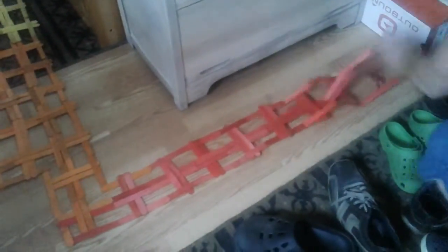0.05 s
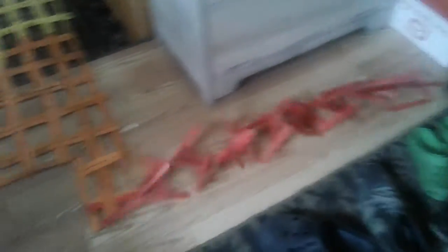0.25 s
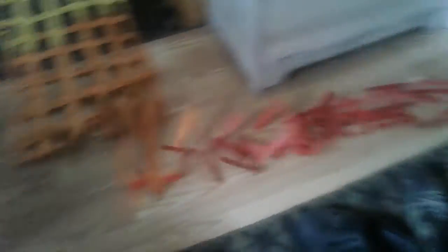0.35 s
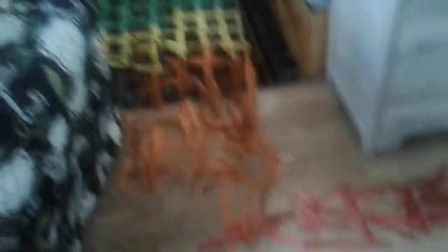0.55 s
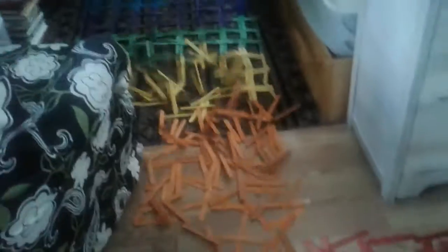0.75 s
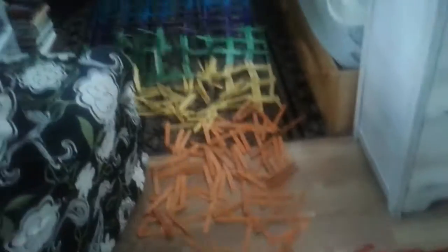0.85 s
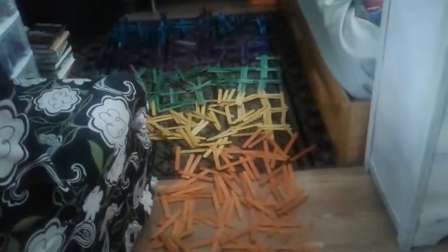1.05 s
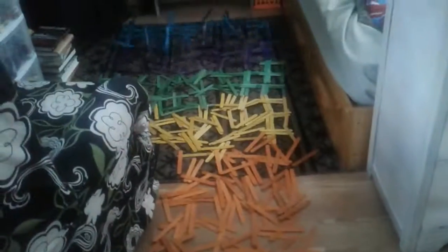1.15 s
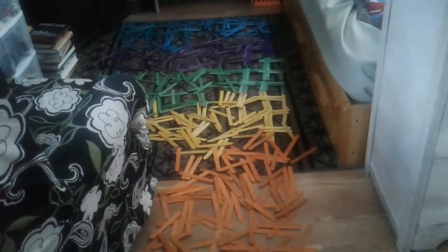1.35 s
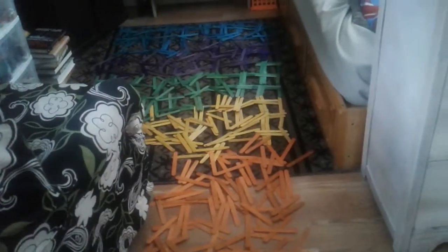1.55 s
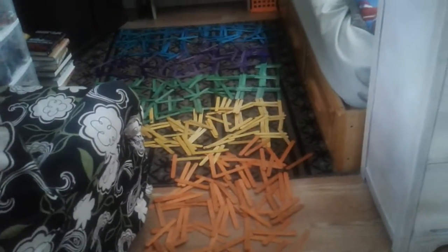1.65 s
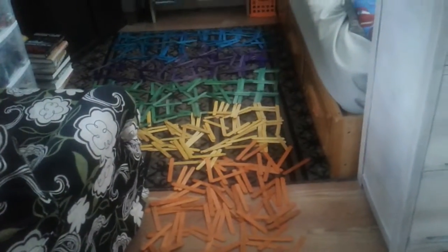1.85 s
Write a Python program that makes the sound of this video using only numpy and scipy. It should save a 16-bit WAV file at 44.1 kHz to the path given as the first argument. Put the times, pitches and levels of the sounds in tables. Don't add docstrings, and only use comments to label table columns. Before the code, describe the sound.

Quiet room with a very faint high whine; faint ticks of slipping wooden sticks from 0.05 s, with a small knock near 0.13. At 0.2 s the chain lets go into a loud, dense, bright clatter, with sharp snaps, ringing ticks and hollow floor slaps until about 1.0. It gradually thins to 1.45, last clumps tick around 1.5-1.65, then a short room tail sinks to near silence.

```python
import sys
import numpy as np
from scipy import signal
from scipy.fft import rfft, irfft
from scipy.io import wavfile

SR = 44100
rng = np.random.default_rng(int(sys.argv[2]) if len(sys.argv) > 2 else 0)


def amplitude_ratio(level_db):
    exponent = np.asarray(level_db, float) / 20
    return 10 ** exponent


def transcribe(u):
    v = np.clip(np.atleast_2d(u).T, -1, 1)
    q = np.round(v * 32767).astype(np.int16)
    wavfile.write(sys.argv[1], SR, q)


N = 83790

# start_s, swell_db, extra_crispness_db, length_s
HANDFULS = [(.222, 2.5, 6.5, 0.006), (.24, -4, 1, 0.0086), (.293, 5.5, -20, 0.0041), (.345, 2.5, 0, 0.02),
            (.374, 4.5, -4, 0.0042), (.444, 4.5, 6, 0.014), (.488, 0, 12, 0.0028), (.548, 1, 7, 0.018),
            (.601, 6.5, -1, 0.0018), (.648, 5.5, -1, 0.0049), (.683, -0.5, -2, 0.0037),
            (.716, -1, 12.5, 0.012), (.751, 1.5, 9, 0.0049), (.808, 0, 5, 0.0068), (.863, -0.5, 4, 0.0047),
            (.903, 2, 3, 0.017), (.956, 2.5, 2, 0.0096), (1.028, 3.5, -0.5, 0.023), (1.065, 0, 4.5, 0.014),
            (1.148, 2.5, 0, 0.012), (1.18, 1, 4, 0.014), (1.226, 1.5, 0.5, 0.021), (1.288, 6, 0, 0.034),
            (1.375, 2.5, -4.5, 0.014), (1.428, 2, 1.5, 0.026), (1.514, 7.5, 4.5, 0.022),
            (1.568, 8, 8, 0.005), (1.604, 8, 4.5, 0.014), (1.548, 0.5, 0, 0.006), (1.72, 10.5, -4.5, 0.01),
            (1.668, 5, -4, .01), (1.794, 16, -3, 0.019)]
CLUMP_HITS_PER_S = 4000
CRISP_AT_DB = -11
SINGLE_RISE_S = 0.0009


def evened(x):
    return x / np.sqrt(np.mean(x ** 2) + 1e-20)


def read(points, hz):
    f, value = np.transpose(points)
    return np.interp(np.log(hz + 1), np.log(f + 1), value)


def coloured(x, points):
    log_gain = np.log(amplitude_ratio(read(points, abs(np.fft.fftfreq(4096, 1 / SR)))))
    minimum_phase = np.exp(np.conj(signal.hilbert(log_gain)))
    taps = np.fft.ifft(minimum_phase).real[:2048]
    return signal.oaconvolve(x, taps)[:len(x)]


def swells(t, start_s, swell_db, length_s):
    distance = (t[:, None] - start_s) / np.maximum(length_s, .002)
    return (swell_db * np.exp(-.5 * distance ** 2)).sum(1)


def hush():
    # pitch_hz, level_db (per Hz)
    hush_tone = [(30, -5), (60, -2.5), (130, -5), (430, -6), (1000, -24), (3000, -31.5), (11000, -55.5),
                 (15800, -40.5)]
    level_db, brush_s, brush_db, brush_length_s = -65.5, 0.2, 12.5, 0.061
    brush = amplitude_ratio(swells(np.arange(N) / SR, np.array([brush_s]), brush_db, brush_length_s))
    noise = coloured(rng.standard_normal(N + 3000), hush_tone)[3000:]
    return amplitude_ratio(level_db) * brush * evened(noise)


def whine():
    pitch_hz, level_db = 15735, -81
    return amplitude_ratio(level_db) * np.sin(2 * np.pi * pitch_hz * np.arange(N) / SR)


def strikes(per_s):
    spread_db = 1.5
    draw = rng.random((3, N))
    size = amplitude_ratio(spread_db * np.minimum(-np.log(draw[1] + 1e-9), 4))
    push_or_pull = np.sign(draw[2] - .5)
    return evened(size * push_or_pull * (draw[0] < per_s / SR))


def falling_sticks():
    # start_s, level_db, floor_knock_share_db
    swarm = [(.05, -83, -1), (.058, -65, 2), (.09, -62.5, 18.5), (.13, -44, 6.5), (.17, -33.5, 0),
             (0.2062, -33, -1), (0.2068, -16.5, 2), (.45, -16, -1), (.8, -15.5, -5.5), (1.07, -19.5, -1),
             (1.11, -19, -4.5), (1.3, -21.5, -0.5), (1.44, -20, -4.5), (1.47, -25, -15.5),
             (1.63, -30.5, -13), (1.67, -42.5, -16), (1.76, -53, -10.5), (1.88, -75.5, -1)]
    # start_s, level_db, floor_knock_db, length_s
    first_slips = [
        (0.0567, -54, -4.5, 0.0095),
        (0.091, -37, -3.5, 0.0068),
        (0.189, -21, -27.5, 0.006),
    ]
    # start_s, swell_db, length_s
    slaps = [
        (0.373, 13.5, .008),
        (0.401, 7, .004),
        (0.503, 8, 0.0048),
        (0.65, 6, 0.034),
        (0.734, 9, .015),
        (.897, 1, .01),
        (1.535, 5.5, .01),
        (1.611, 2, 0.005),
    ]
    hits_per_s, swarm_db, slip_db, first_contact = 2800, -3.5, -3.5, 0.5
    board_db, slip_board_db = -17.5, 5.5

    t = np.arange(N) / SR
    s, level_db, knock_db = np.transpose(swarm)
    start_s, swell_db, _, length_s = np.transpose(HANDFULS)
    busy_db = np.interp(t, s, level_db, left=-120)
    hits = strikes(hits_per_s) * amplitude_ratio(swarm_db + busy_db)
    on_sticks = hits * amplitude_ratio(swells(t, start_s, swell_db, length_s))
    board_share_db = np.interp(t, s, knock_db) + swells(t, *np.transpose(slaps))
    on_boards = hits * amplitude_ratio(board_db + board_share_db)

    burst = strikes(CLUMP_HITS_PER_S)
    for start, slip_level_db, floor_db, lasting in first_slips:
        at = round(start * SR)
        fade_db = -20 * np.minimum(t[:N - at] / max(lasting, .001), 6)
        slip = burst[at:] * amplitude_ratio(slip_level_db + slip_db + fade_db)
        slip[0] += first_contact * amplitude_ratio(slip_level_db + slip_db)
        on_sticks[at:] += slip
        on_boards[at:] += slip * amplitude_ratio(floor_db + slip_board_db)
    return on_sticks, on_boards, busy_db


def rung(hits, low_hz, high_hz, t60_s, tick_db, count):
    patch_db, patch_s, family_width = 2.5, .025, 0.3545
    which, t = rng.integers(0, count, N), np.arange(1000) / SR
    centre = (np.arange(count)[:, None, None] + .5) / count
    place = np.clip(centre + family_width * (rng.random((count, 3, 1)) - .5), 0, 1)
    knots = np.arange(0, N / SR + 1, patch_s)
    drift = rng.standard_normal((200, 6))[:len(knots)]
    patches = [amplitude_ratio(patch_db * np.interp(np.arange(N) / SR, knots, d)) * hits for d in drift.T]
    out = amplitude_ratio(tick_db) * hits
    for k, lasting in enumerate(rng.random((count, 3, 1))):
        hz = low_hz * (high_hz / low_hz) ** place[k]
        decay = amplitude_ratio(-60 * t / (t60_s * (.5 + lasting))) / np.sqrt(.5 + lasting)
        ring = (np.sin(2 * np.pi * hz * t) * decay).sum(0)
        own_hits = patches[6 * k // count] * (which == k)
        out = out + signal.oaconvolve(own_hits, ring / np.linalg.norm(ring))[:N]
    return out


def ringing_wood(on_sticks, busy_db):
    crisp_hz, crisp_per_db = 8500, 0.57
    start_s, _, extra_db, length_s = np.transpose(HANDFULS)
    wood = rung(on_sticks, low_hz=1909, high_hz=10060, t60_s=0.021, tick_db=4, count=72)
    edge = signal.sosfiltfilt(signal.butter(2, crisp_hz, "high", fs=SR, output="sos"), wood)
    extra_crisp_db = swells(np.arange(N) / SR, start_s, extra_db, length_s)
    crisp = amplitude_ratio(crisp_per_db * (busy_db - CRISP_AT_DB) + extra_crisp_db)
    return wood + (crisp - 1) * edge


def close_snaps():
    # start_s, peak_db
    snaps = [(0.237, -32), (0.3447, -30.5), (0.3737, -29.5), (0.3944, -34), (0.408, -30), (0.428, -31.5),
             (0.4413, -32), (0.4744, -28), (0.512, -32.5), (0.5649, -29.5), (0.6156, -25.5), (0.64, -32),
             (0.683, -32.5), (0.7102, -28.5), (0.7309, -29), (0.9057, -32), (0.954, -36.5), (1.0223, -35),
             (1.0729, -36), (1.5597, -40)]
    snap_db, t60_s = 32, .015
    burst, out = strikes(CLUMP_HITS_PER_S), np.zeros(N)
    fade = amplitude_ratio(-60 * np.arange(800) / SR / t60_s)
    for start, peak_db in snaps:
        at = round(start * SR)
        snap = burst[at:at + 800] * fade
        out[at:at + 800] += amplitude_ratio(peak_db + snap_db) * snap / np.linalg.norm(snap)
    return out


def resonate(x, hz, width_hz):
    r = np.exp(-np.pi * width_hz / SR)
    turn = 2 * np.pi * hz / SR
    return signal.lfilter([1 - r * r], [1, -2 * r * np.cos(turn), r * r], x) * np.sin(turn)


def through_port(wood, busy_db):
    # pitch_hz, level_db
    stick_tone = [(130, -25), (500, -32.5), (2300, -22.5), (4200, -9.5), (5600, -9), (9500, -9),
                  (13000, -23), (16000, -34.5)]
    port_hz, port_width_hz, port_db, body_per_db = 7033, 790, 16.5, 0.04
    treble = coloured(wood, stick_tone)
    body = amplitude_ratio(body_per_db * np.clip(busy_db - CRISP_AT_DB, -45, 0))
    return body * treble + amplitude_ratio(port_db) * resonate(treble, port_hz, port_width_hz)


def floorboards(on_boards):
    # pitch_hz, level_db
    board_tone = [(60, -27), (130, -8), (450, -12), (650, -2), (1000, -3.5), (2200, 1.5), (5000, -20.5)]
    thuds = rung(on_boards, low_hz=538, high_hz=2440, t60_s=0.011, tick_db=-22.5, count=36)
    return coloured(thuds, board_tone)


def clatter():
    on_sticks, on_boards, busy_db = falling_sticks()
    wood = ringing_wood(on_sticks, busy_db) + close_snaps()
    return through_port(wood, busy_db) + floorboards(on_boards)


def hollow_knocks():
    # start_s, peak_db, pitch_hz, t60_s
    knocks = [(.0905, -36.5, 1030, 0.021), (0.1297, -21.5, 6720, 0.01), (.1875, -24.5, 3170, 0.014),
              (.392, -21, 1300, 0.025), (.65, -24.5, 852, 0.037), (.564, -36.5, 720, 0.045),
              (.0905, -40.5, 446, 0.02), (.268, -47.5, 640, 0.091), (.278, -29.5, 617, 0.09),
              (.374, -32, 870, 0.093), (.72, -30, 844, 0.048), (.732, -24.5, 970, 0.033)]
    t, out = np.arange(N) / SR, np.zeros(N)
    for start, peak_db, hz, t60_s in knocks:
        u = np.maximum(t - start, 0)
        rise = 1 - np.exp(-u / SINGLE_RISE_S)
        out += rise * amplitude_ratio(peak_db - 60 * u / t60_s) * np.sin(2 * np.pi * hz * u)
    return out


def bumps():
    # start_s, peak_db, pitch_hz
    floor_bumps = [(.10, -59, 60.3), (0.211, -74, 231), (0.382, -50, 231), (0.429, -48, 125),
                   (0.528, -51.5, 137.4), (0.778, -52.5, 124.4), (.99, -51, 62), (1.051, -52, 131),
                   (1.282, -49, 126), (1.299, -47.5, 210), (1.398, -48, 135.7), (1.49, -49.5, 137.6),
                   (1.498, -53.5, 251.5), (1.649, -62, 139)]
    t60_s, rise_s, bump_db = 0.37, 0.017, 4.5
    t, out = np.arange(N) / SR, np.zeros(N)
    for start, peak_db, hz in floor_bumps:
        u = np.maximum(t - start, 0)
        rise = 1 - np.exp(-u / rise_s)
        out += rise * amplitude_ratio(peak_db + bump_db - 60 * u / t60_s) * np.sin(2 * np.pi * hz * u)
    return out


def singles(table, t60_s, trim_db):
    t, out = np.arange(3000) / SR, np.zeros(N + 3000)
    shape = (1 - np.exp(-t / SINGLE_RISE_S)) * amplitude_ratio(trim_db - 60 * t / t60_s)
    for start, peak_db, hz in table:
        at = round(start * SR)
        out[at:at + 3000] += amplitude_ratio(peak_db) * shape * np.sin(2 * np.pi * hz * t)
    return out[:N]


def stick_rings():
    # start_s, peak_db, pitch_hz
    rings = [(0.211, -22, 5080), (0.215, -24, 4090), (0.2654, -13, 3830), (0.2784, -31, 4740),
             (0.2833, -13, 3490), (0.2898, -25, 5430), (0.2968, -21, 5000), (0.2978, -20, 3570),
             (0.3013, -19.5, 2020), (0.3707, -20, 4650), (0.3746, -14, 3700), (0.3811, -35, 2110),
             (0.3816, -15, 4390), (0.3921, -20, 2670), (0.3921, -17, 3140), (0.4056, -17, 5170),
             (0.424, -19, 4690), (0.4245, -15, 3880), (0.4435, -24, 4870), (0.5009, -10, 4440),
             (0.5333, -15, 5000), (0.5443, -27, 4050), (0.5532, -8, 5600), (0.6445, -23, 3830),
             (0.647, -12, 5080), (0.7493, -12, 5120), (0.7952, -11.5, 5170), (0.89, -12, 4650),
             (0.9214, -21, 4180), (0.9548, -19, 4310), (1.0032, -22, 3830), (1.0311, -22.5, 4310),
             (1.1773, -34, 2020), (1.2551, -25.5, 5040), (1.2651, -20.5, 5340), (1.2866, -21, 4690),
             (1.31, -26.5, 4570), (1.3689, -27.5, 4010), (1.4352, -23.5, 4390), (1.4367, -21.5, 3880),
             (1.5106, -28, 5210), (1.5146, -26, 4650), (1.5245, -21.5, 4390), (1.5764, -22.5, 4310)]
    return singles(rings, t60_s=0.011, trim_db=8.5)


def port_pings():
    # start_s, peak_db, pitch_hz
    pings = [(0.2205, -7.5, 7150), (0.229, -6.5, 7150), (0.2385, -8.5, 6800), (0.2893, -10.5, 7110),
             (0.2953, -14, 6850), (0.3078, -14, 6850), (0.3158, -15.5, 7020), (0.3442, -17, 6550),
             (0.3677, -18.5, 6800), (0.427, -9, 6850), (0.4445, -11, 6760), (0.45, -13, 6980),
             (0.4774, -4, 6930), (0.4849, -14.5, 6760), (0.5398, -2.5, 6760), (0.5478, -7, 6980),
             (0.6006, -5, 6200), (0.6156, -8.5, 6800), (0.6415, -11.5, 6720), (0.7139, -12.5, 7240),
             (0.7258, -10, 7320), (0.7877, -5.5, 6550), (0.7947, -12, 6890), (0.8161, -11.5, 6850),
             (0.8615, -9.5, 7060), (0.8955, -13, 7110), (0.9014, -7.5, 6460), (0.9134, -6.5, 6800),
             (0.9369, -16.5, 6980), (1.0486, -15, 7280), (1.0651, -8.5, 6460), (1.1459, -14, 6890),
             (1.1758, -12, 6890), (1.2252, -19, 6550), (1.2691, -11, 6720), (1.2831, -8.5, 6630),
             (1.298, -18.5, 7060), (1.3045, -24.5, 7060), (1.3839, -11.5, 6980), (1.4258, -11, 6930),
             (1.4322, -14, 6980), (1.4432, -18.5, 6850), (1.5096, -29, 6550), (1.5664, -20, 6890),
             (1.5979, -23, 7110), (1.6039, -13, 6890)]
    return singles(pings, t60_s=.018, trim_db=5.5)


def room(x):
    # pitch_hz, t60_s
    room_decay = [(200, 0.73), (1000, 0.88), (4500, 0.39), (12000, 0.39)]
    turns_per_s = 3.025
    taps, at = np.zeros((3, SR)), np.arange(60, SR - 20, 20)
    places = at + rng.integers(0, 20, (3, len(at)))
    np.put_along_axis(taps, places, rng.choice([-1., 1.], (3, len(at))), axis=1)
    hz, t, z = signal.stft(taps, SR, nperseg=256)
    decay = amplitude_ratio(-60 * t / read(room_decay, hz)[:, None])
    tail = signal.istft(z * decay, SR, nperseg=256)[1]
    phase = turns_per_s * np.arange(N) / SR + np.arange(3)[:, None] / 3
    turn = np.cos(2 * np.pi * phase) * np.sqrt(2 / 3)
    return signal.fftconvolve(x * turn, tail / np.linalg.norm(tail[0]), axes=1)[:, :N].sum(0)


def scene():
    light_hz, room_db = 110, -7.5
    near = whine() + clatter() + hollow_knocks() + stick_rings() + port_pings()
    near = signal.lfilter(*signal.butter(2, light_hz, "high", fs=SR), near)
    mono = hush() + near + bumps() + amplitude_ratio(room_db) * room(near)
    return np.array([mono, mono])


def top_cut(x):
    return signal.sosfilt(signal.butter(12, 16810, fs=SR, output="sos"), x)


def record(dry):
    ceiling, fade_s, fade_db_per_s = .8, 1.6, -15.5
    low_cut_hz, edge_hz = 35, 15800
    lean_low_hz, lean_high_hz, lean_share = 5600, 6760, 0.05
    held = dry[0] / (1 + (dry[0] / ceiling) ** 4) ** (1 / 4)
    held = held * amplitude_ratio(fade_db_per_s * np.maximum(np.arange(N) / SR - fade_s, 0))
    hz = np.fft.rfftfreq(N, 1 / SR)
    z = rfft(held) * (hz < edge_hz) * hz ** 2 / (hz ** 2 + low_cut_hz ** 2)
    lean = lean_share * ((hz > lean_low_hz) & (hz < lean_high_hz))
    mix = irfft(z * np.array([1 + lean, 1 - lean]), N)
    return top_cut(mix)


dry = scene()
out = record(dry)
transcribe(out)
```